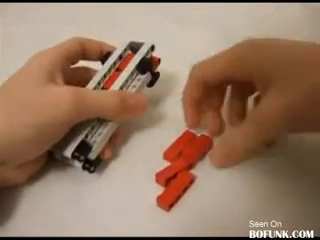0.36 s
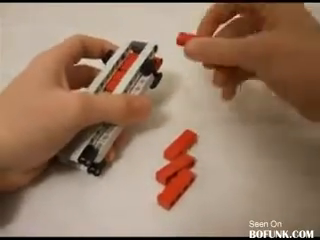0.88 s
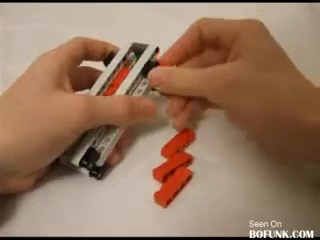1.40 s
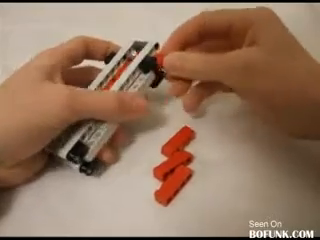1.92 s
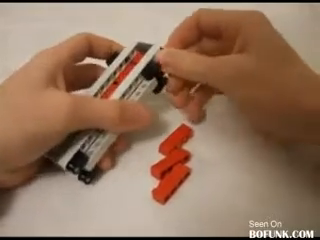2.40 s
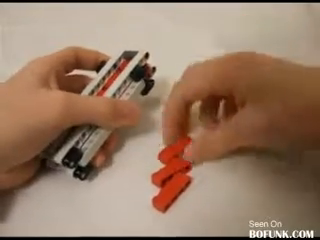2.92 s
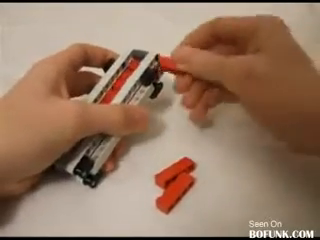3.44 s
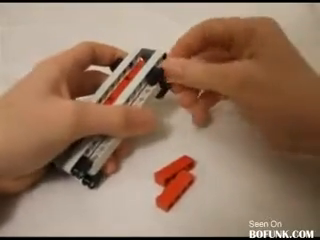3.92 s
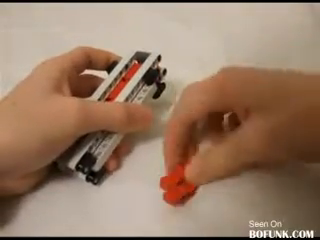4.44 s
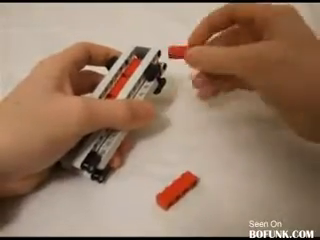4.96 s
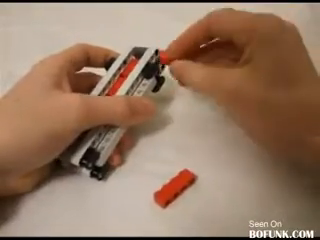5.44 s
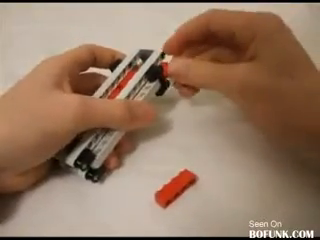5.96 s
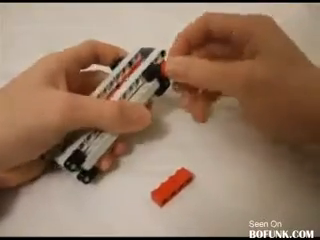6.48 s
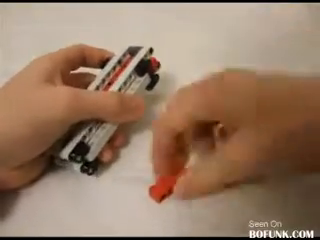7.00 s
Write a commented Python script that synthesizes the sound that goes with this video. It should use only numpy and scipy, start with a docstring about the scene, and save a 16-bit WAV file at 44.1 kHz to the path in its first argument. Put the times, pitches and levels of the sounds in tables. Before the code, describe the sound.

Close, crisp plastic clicks and grainy scrapes as toy bricks are pushed in one by one, above constant microphone hiss in a quiet room.

```python
"""Small plastic bricks are pushed one by one into a sprung holder built of the same bricks, close to a cheap
camera: brief blows excite the short damped modes of bricks and holder as clicks; dense ticks add grainy rattle.
Low damped swings carry the jolts, and filtered noise forms a short tail from table and walls.
The camera adds shaped amplifier hiss and a whine of two sign-flipping tones near 8 kHz.
For a while a far engine, three harmonic orders of one wavering speed, drones through the walls."""
import sys
import numpy as np
from scipy import signal
from scipy.fft import rfft, irfft, next_fast_len
from scipy.io import wavfile

SR = 44100
rng = np.random.default_rng(int(sys.argv[2]) if len(sys.argv) > 2 else 0)


def unload_wav(signal):
    """Save mono or channel-first audio to the path in sys.argv[1] as 16-bit WAV at rate SR, clipped to [-1, 1]."""
    wavfile.write(
        sys.argv[1],
        SR,
        np.round(np.clip(np.atleast_2d(signal).T, -1, 1) * 32767).astype(np.int16),
    )


def makeup_ratio(level_db):
    """Linear amplitude ratio for a level in decibels (20 dB per factor of ten)."""
    decades = np.asarray(level_db, float) / 20
    return 10 ** decades


N = 313551   # length in samples


def rms_one(x):
    """Power normalisation: the mean square is scaled to one."""
    return x / np.sqrt(np.mean(x ** 2) + 1e-20)


def drift(corner_hz):
    """Low-pass random process: noise through two equal one-pole filters wanders slowly with unit rms."""
    hop = 40   # samples between the slow values
    pole = np.exp(-2 * np.pi * corner_hz * hop / SR)
    noise = rng.standard_normal(N // hop + 2002)
    slow = signal.lfilter([1], [1, -2 * pole, pole * pole], noise)[2000:]   # the filter's start is left out
    return np.interp(np.arange(N) / hop, np.arange(len(slow)), rms_one(slow))


def ring(blows, hz, t60):
    """Damped resonator: a unit blow sets a decaying sine of initial height 1 ringing."""
    radius = makeup_ratio(-60 / (t60 * SR))
    angle = 2 * np.pi * hz / SR
    return signal.lfilter([0, np.sin(angle)], [1, -2 * radius * np.cos(angle), radius * radius], blows + 1e-18)


# Far engine, pulling up through its gears and then slowing. Each row: time in seconds, speed in turns
# per second before its wavering, then usual rms levels in dB of orders 2, 3 and 4.
ENGINE_COURSE = [(.3, 52.5, -85, -80, -74), (.55, 54.2, -85, -66, -62), (.8, 53, -74, -68, -68),
                 (1.1, 53.5, -65, -60, -70), (1.55, 58.5, -85, -64, -85), (1.72, 53, -85, -68, -70),
                 (2.05, 55.5, -80, -65, -62), (2.2, 50.5, -64, -76, -72), (2.7, 52.8, -62, -85, -63),
                 (2.95, 52.5, -68, -85, -70), (3.3, 47, -66, -85, -85), (3.65, 41.5, -74, -85, -85)]


def drone():
    """Harmonic orders: three multiples of one wavering engine speed swell and fade through the walls."""
    s, turns_hz, *orders_db = np.transpose(ENGINE_COURSE)
    t = np.arange(N) / SR
    speed_hz = np.interp(t, s, turns_hz) * (1 + .005 * drift(5))
    turns = np.cumsum(speed_hz) / SR
    out = np.zeros(N)
    for order, db in enumerate(orders_db, start=2):
        level_db = np.interp(t, s, db, -99, -99) + 1.2 * drift(4)
        out += np.sqrt(2) * makeup_ratio(level_db) * np.sin(2 * np.pi * order * turns)
    return out


# Spectrum of the amplifier noise. Each row: frequency in Hz, relative spectral density in dB per Hz.
HISS_SPECTRUM = [(8.8, -44), (15, -3.5), (27, -16), (100, -15.5), (132, -20.5), (160, -16.5), (466, -17.5),
                 (1560, -20.5), (1790, -21), (2490, -22), (6710, -24), (7910, -22.5), (10700, -33.5),
                 (13900, -80), (22000, -120)]


def hiss():
    """Spectral shaping: white noise is weighted by frequency into the microphone amplifier's smooth noise."""
    size = next_fast_len(N)
    hz = np.arange(1, size // 2 + 2) * SR / size
    at_hz, density_db = np.transpose(HISS_SPECTRUM)
    gain = makeup_ratio(np.interp(np.log(hz), np.log(at_hz), density_db))
    shaped = irfft(rfft(rng.standard_normal(size)) * gain, size)[:N]
    level_db = -50 + 0.68 * drift(5.0)
    return makeup_ratio(level_db) * rms_one(shaped)


# Tones of the camera. Each row: frequency in Hz before the flipping, rms level in dB.
WHINE_TONES = [(7874.7, -59.5), (8126.7, -59)]


def whine():
    """Phase reversal: two tones either side of 8 kHz flip sign with each of 30 picture frames a second."""
    t = np.arange(N) / SR
    flips = signal.square(2 * np.pi * 15 * t + rng.uniform(0, 2 * np.pi))   # two flips a cycle
    tones = np.zeros(N)
    for hz, db in WHINE_TONES:
        tones += np.sqrt(2) * makeup_ratio(db) * np.sin(2 * np.pi * hz * t + rng.uniform(0, 2 * np.pi))
    return flips * tones


def room(x):
    """Reverberation: table and walls send back a short dense decaying tail, thin in the bass."""
    t60_s, gap_s, length_s = 0.2, .003, .3
    t = np.arange(round(length_s * SR)) / SR
    tail = rng.standard_normal(len(t)) * makeup_ratio(-60 * t / t60_s) * (t > gap_s)
    tail = signal.sosfilt(signal.butter(1, [600, 7000], "band", fs=SR, output="sos"), tail)
    unit_energy_tail = tail / np.sqrt(np.sum(tail ** 2))
    return signal.fftconvolve(x, unit_energy_tail)[:N]


# Jolts passed through hand and table. Each row: time in seconds, starting height in dB, frequency in Hz.
JOLTS = [(0.194, -56, 247), (2.171, -31, 186), (2.5, -39, 287.5), (2.785, -31, 162), (3.643, -35, 40.1),
         (3.657, -27, 401.2), (4.005, -41, 45), (5.959, -41, 94.7), (6.74, -41, 335.5)]


def thumps():
    """Damped oscillation: each jolt is a low swing that dies within a few cycles."""
    out = np.zeros(N)
    for s, db, hz in JOLTS:
        blow = np.bincount([round(s * SR)], [makeup_ratio(db)], N)
        out += ring(blow, hz, t60=4.1 / hz)
    return out


def pitches(middle_db, low_db, hz):
    """Modal emphasis: a contact's own pitch lies in treble or body; the other takes its usual value."""
    hollow_hz, tight_hz, bright_hz = 1120, 1960, 6200   # usual strongest low, middle and treble pitches
    dull = hz < 3500
    usual_body_hz = np.where(low_db > middle_db, hollow_hz, tight_hz)
    return np.where(dull, bright_hz, hz), np.where(dull, hz, usual_body_hz)


# Modes of bricks and holder. Each row: frequency in Hz, relative level in dB, decay by 60 dB in seconds.
MODES = [(450, -5.5, 0.01), (632, -7, 0.022), (826, -4.5, 0.024), (980, 0, 0.013), (1360, -8, 0.007),
         (1607, -2, 0.0042), (1765, -9.5, 0.0087), (1952, -8, 0.013), (2090, -7.5, 0.012),
         (2350, 1, 0.0072), (2673, -3, 0.0091), (3036, -5.5, 0.0061), (3780, -4.5, 0.0074),
         (4270, -3, 0.0076), (4800, 0, 0.0043), (5300, 2, 0.0033), (5800, -6.5, 0.0083), (6300, -5, 0.0048),
         (7000, -3.5, 0.0041), (7820, -2, 0.0063), (8440, -2, 0.0076), (9060, 1, 0.0053), (9850, -6, 0.016),
         (10430, -3.5, 0.0024)]


def strike(at, treble_db, middle_db, low_db, treble_hz, body_hz, scatter_db):
    """Modal superposition: blows ring every mode by chance strength and sign, favouring two pitches."""
    hz, mode_db, t60 = np.transpose(MODES)
    treble, low = hz > 3500, hz < 1400
    db = np.where(treble, treble_db, np.where(low, low_db, middle_db)) + mode_db
    octaves = np.log2(hz / np.where(treble, treble_hz, body_hz))
    treble_loss_db = np.minimum(70 * octaves ** 2, 11)
    body_loss_db = np.minimum(30 * octaves ** 2, 7)
    db = db - np.where(treble, treble_loss_db, body_loss_db)
    strength = makeup_ratio(db + rng.normal(0, scatter_db, db.shape)) * rng.choice([-1, 1], db.shape)
    # chance shares out each blow's energy among the modes without changing its sum
    energy = np.sum(makeup_ratio(2 * db), axis=1)
    strength *= np.sqrt(energy / np.sum(strength ** 2, axis=1))[:, None]
    contact_t60_s = .003   # the contact lasts a moment, so each mode swells before it decays
    contact_gain = 2 * np.log(1000) / (contact_t60_s * SR)
    out = np.zeros(N)
    for k in range(len(hz)):
        swelling = ring(np.bincount(at, strength[:, k], N), hz[k], contact_t60_s)
        out += ring(swelling, hz[k], t60[k]) * contact_gain
    return out


# Spans of grainy rattle, some from sliding bricks, some only a soft smear heard ahead of a click.
# Each row: start in seconds, end in seconds, level in dB before the tick scatter, body level relative
# to treble in dB (dullness), strongest treble frequency in Hz.
RATTLE_SPANS = [(.21, .262, -55, 0, 5450), (1.44, 1.553, -55.5, 8.5, 5930), (1.58, 1.62, -42, -2, 5900),
                (1.71, 1.743, -43, -.5, 5300), (2.169, 2.199, -29.5, -7, 4700),
                (2.488, 2.496, -30, -13, 7200), (2.743, 2.86, -62, 12.5, 5050),
                (3.64, 3.693, -41.5, -17, 6650), (3.819, 3.845, -44.5, 3, 6200),
                (4.106, 4.154, -45.5, 5.5, 5830), (5.722, 5.76, -58, 14.5, 6800),
                (5.805, 5.835, -38.5, 5, 6150), (5.854, 5.884, -42, 2.5, 5460),
                (5.965, 5.988, -32, -6, 6460), (6.046, 6.1, -44, 5, 6120),
                (6.124, 6.188, -51.5, -13.5, 5000), (6.348, 6.391, -48, 0, 6000)]


def rattles(per_s, uneven_db):
    """Random impulse excitation: uneven ticks ring the modes around clicks and in spans; loudest leads."""
    t = np.arange(N) / SR
    lead_db, lead_db_per_s = -24, 900   # a soft smear of sound swells just before each click
    settle_db, settle_db_per_s, settle_dull_db = -22, 600, -6   # loose bricks settle after it
    span_in_s, span_out_s = .008, .03
    causes = []
    for s, click_db, _, _, hz in CONTACTS:
        lead = lead_db + lead_db_per_s * (t - s)
        settle = settle_db - settle_db_per_s * (t - s)
        causes.append((click_db + np.where(t < s, lead, settle), settle_dull_db, pitches(0, 0, hz)[0]))
    for start, end, span_db, dull_db, hz in RATTLE_SPANS:
        corners = [start - span_in_s, start, end, end + span_out_s]
        causes.append((span_db + np.interp(t, corners, [-20, 0, 0, -20], -100, -100), dull_db, hz))

    # level in dB, dullness in dB and treble pitch in Hz of whichever leads; pitch 0 means silence
    colour = np.zeros((3, N)) + [[-75], [0], [0]]
    for db, dull_db, treble_hz in causes:
        loudest = db > colour[0]
        colour[0, loudest] = db[loudest]
        colour[1:, loudest] = [[dull_db], [treble_hz]]
    size_db = uneven_db * np.minimum(rng.exponential(1, N), 3)
    at = np.flatnonzero((rng.random(N) < per_s / SR) & (colour[2] > 0))
    db, dull_db, treble_hz = colour[:, at, None]
    db = db + size_db[at, None] - 7.5
    body_db = db + dull_db
    return strike(at, db, body_db - 1.5, body_db - 8, treble_hz, body_hz=1500, scatter_db=5.0)


# Contacts between bricks. Each row: time in seconds, then treble, middle and low levels in dB before
# the mode and pitch weighting, strongest frequency in Hz.
CONTACTS = [(.046, -18, -29, -30, 6300), (0.0486, -11.5, -24, -25.5, 7200),
            (0.0514, -13, -22.5, -24.5, 6450), (.134, -58, -28.5, -35, 850),
            (0.1903, -11, -14, -14.5, 2540), (0.193, -2.5, -15.5, -16, 6540),
            (0.1951, -9.5, -15, -31, 4750), (0.1997, -20, -34, -29, 6750), (.729, -32.5, -60, -60, 7360),
            (.744, -19.5, -32.5, -39, 7000), (.7488, -25, -39, -54.5, 7000),
            (1.2232, -24.5, -31, -59, 5660), (1.2637, -27, -27.5, -62, 5300),
            (1.3338, -32.5, -36, -36, 4640), (1.372, -33.5, -35, -37, 5600), (1.436, -20.5, -30, -40, 7000),
            (1.4397, -22, -26.5, -27.5, 5230), (1.455, -50, -30, -29.5, 600), (1.521, -50, -48, -34, 616),
            (1.5391, -55, -36, -45, 1590), (1.551, -55, -46, -32, 596), (1.5969, -31, -35, -36, 5900),
            (1.601, -44, -28, -43, 1680), (1.6249, -18, -11.5, -19.5, 1930),
            (1.7159, -24, -18.5, -36, 4800), (1.7328, -25, -27, -29, 5930), (1.9095, -31, -28.5, -32, 4880),
            (1.9309, -13, -20.5, -25, 5300), (1.953, -25, -32, -32.5, 5200),
            (2.1685, -10.5, -20.5, -19.5, 7400), (2.172, -19, -18, -17.5, 4900),
            (2.1764, -5.5, -18, -19, 4584), (2.1866, -14, -28, -44, 4500), (2.4877, -23, -29, -60, 7560),
            (2.4972, -4.5, -12, -18.5, 7180), (2.4995, -6.5, -18, -27, 6560),
            (2.503, -8.5, -20, -19.5, 7100), (2.5078, -19, -45, -26.5, 5400), (2.79, -57, -50, -29, 640),
            (2.8041, -37, -19.5, -18, 980), (3.5699, -19.5, -27, -35.5, 6440),
            (3.5978, -34.5, -31, -40, 5375), (3.6574, -2.5, -11.5, -54, 6300), (3.675, -29, -36, -53, 6470),
            (3.8417, -28.5, -23.5, -27, 1297), (3.873, -17.5, -17.5, -18, 2570),
            (3.9427, -31, -38, -46, 7850), (3.96, -18.5, -31.5, -31, 6900), (3.98, -46, -33, -34, 6990),
            (4.0232, -10.5, -18, -20, 6300), (4.1142, -26, -27.5, -50, 6200),
            (4.1271, -27.5, -26.5, -42, 4230), (4.1336, -29, -27, -44.5, 5400),
            (4.5826, -28, -45, -58, 5880), (4.7185, -33.5, -39, -45, 7300), (5.2635, -38, -32, -34, 5800),
            (5.5163, -24, -26, -36, 5600), (5.5364, -23, -34, -38, 6300), (5.5717, -13, -30.5, -51, 5890),
            (5.6111, -25.5, -26, -33.5, 5270), (5.743, -44, -48, -29, 6520), (5.7507, -39, -53, -29, 6300),
            (5.8102, -24, -20.5, -48, 5640), (5.8155, -20, -21, -20.5, 6340),
            (5.836, -37, -30, -29.5, 6800), (5.8662, -24.5, -23.5, -21, 2350),
            (5.8908, -38, -38, -38, 5090), (5.961, -5, -11.5, -39, 6187), (5.963, -2.5, -16, -16, 6240),
            (6.0516, -33, -41, -31, 898), (6.0625, -25.5, -26, -21, 5800), (6.0672, -34, -24, -29, 1400),
            (6.0856, -27, -35, -53, 6300), (6.0984, -8, -20, -19, 5800), (6.3598, -16, -23.5, -23.5, 5340),
            (6.3691, -25.5, -32, -32, 5650), (6.3801, -30.5, -32, -32, 5336),
            (6.7398, -6.5, -17, -17.5, 7010), (6.7434, -2.5, -15, -42, 6650), (6.7452, -10, -29, -23, 5774)]


def clicks():
    """Impact excitation: sharp single contacts set the modes of bricks and holder ringing."""
    s, treble_db, middle_db, low_db, hz = np.transpose(CONTACTS)[:, :, None]
    at = np.round(s[:, 0] * SR).astype(int)
    treble_hz, body_hz = pitches(middle_db, low_db, hz)
    return strike(at, treble_db, middle_db, low_db, treble_hz, body_hz, scatter_db=2.0)


def scene():
    """Linear superposition: bricks near, room and engine far, electronics on top."""
    bricks = clicks() + rattles(per_s=2500, uneven_db=3.5)
    reflections = makeup_ratio(-23) * room(bricks)
    electronics = hiss() + whine()
    return (bricks + reflections + thumps() + drone() + electronics)[None]


def low_pass(x):
    """Removes everything above the highest recorded frequency."""
    return signal.sosfilt(signal.butter(12, 12590, fs=SR, output="sos"), x)


def record(dry):
    """Saturation and spectral imaging: rounded peaks, a half-rate band and a faint mirror of its top."""
    rounded = .95 * np.tanh(dry / .95)
    half = signal.sosfilt(signal.ellip(12, .5, 70, 10650, fs=SR, output="sos"), rounded)
    # alternating signs mirror the spectrum about SR / 4, as doubling a half rate does
    mirror = half * (-1) ** np.arange(N)
    leak = signal.sosfilt(signal.cheby2(10, 65, 12950, fs=SR, output="sos"), mirror)
    offset = -.0029   # constant shift of the zero line
    finished = half + leak + offset
    return low_pass(finished)


dry = scene()
out = record(dry)
unload_wav(out)
```